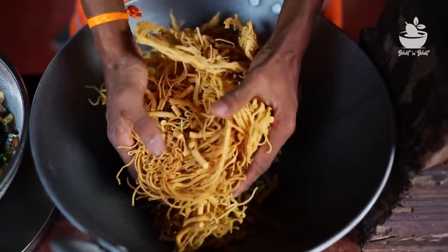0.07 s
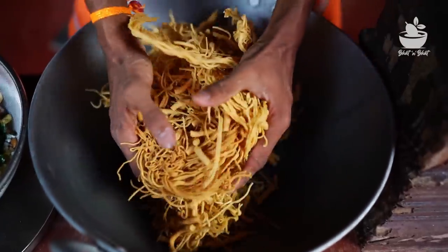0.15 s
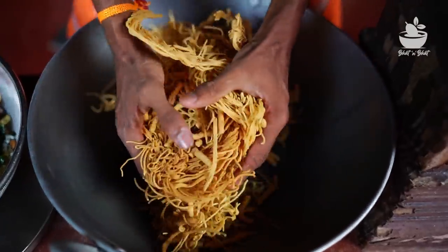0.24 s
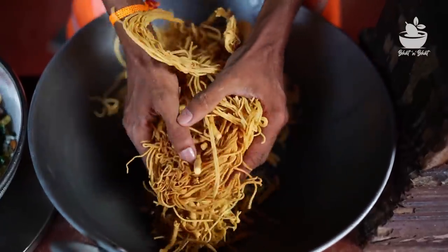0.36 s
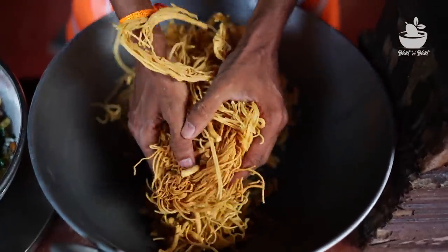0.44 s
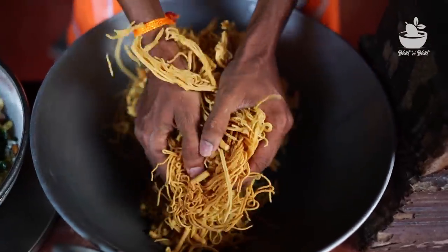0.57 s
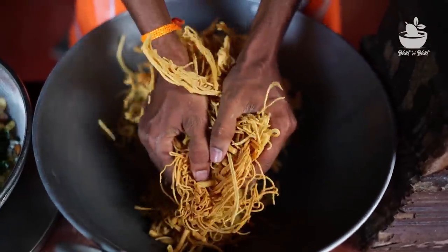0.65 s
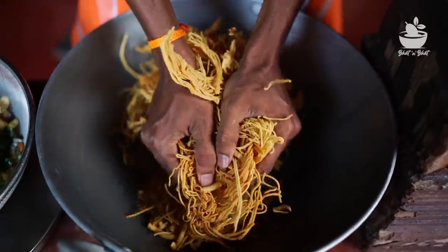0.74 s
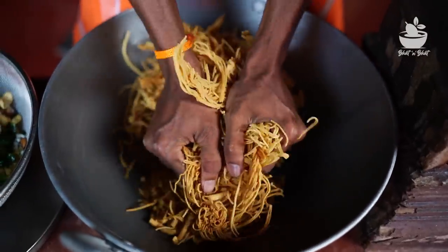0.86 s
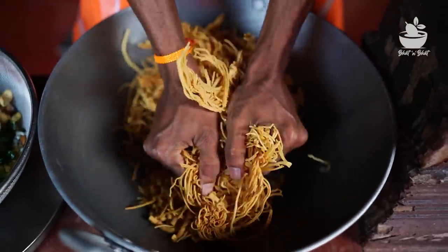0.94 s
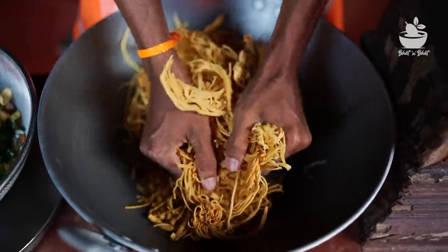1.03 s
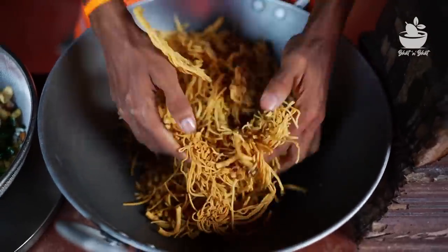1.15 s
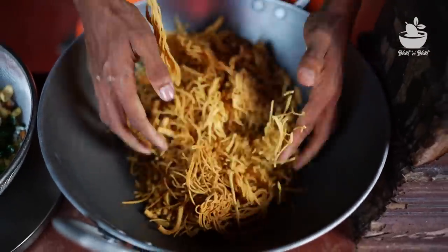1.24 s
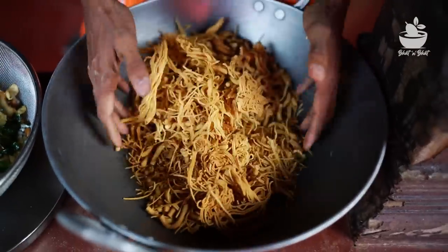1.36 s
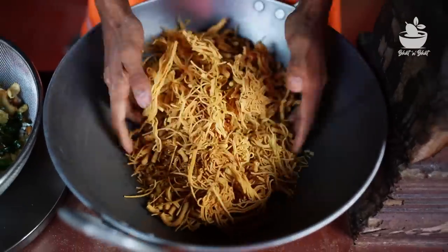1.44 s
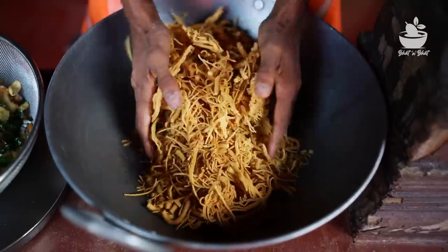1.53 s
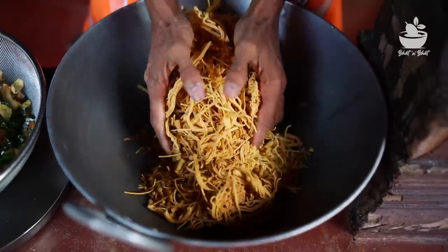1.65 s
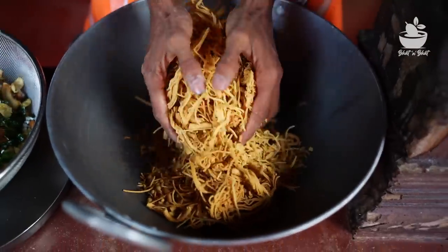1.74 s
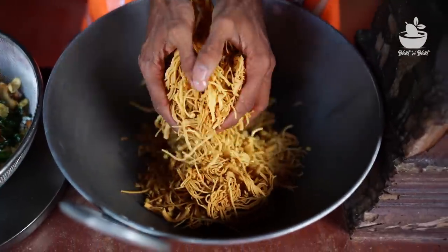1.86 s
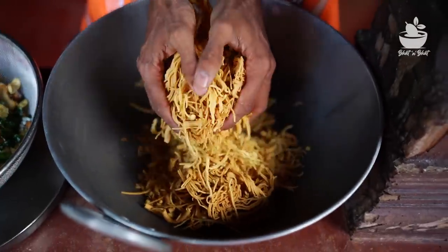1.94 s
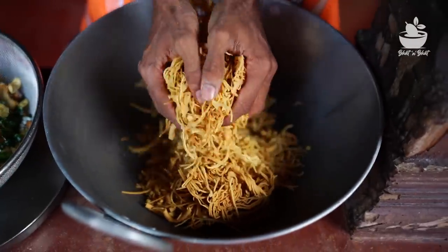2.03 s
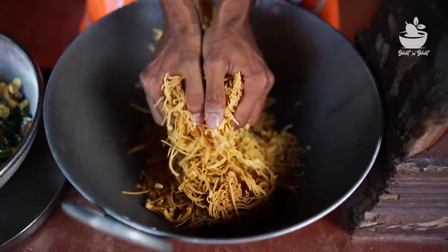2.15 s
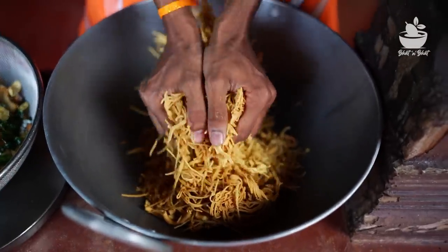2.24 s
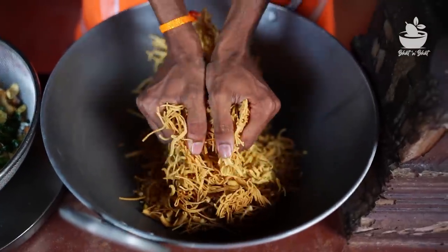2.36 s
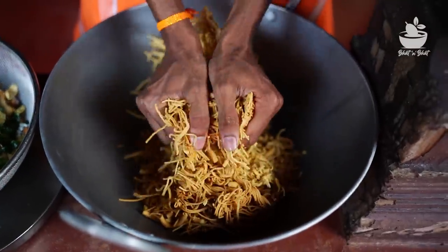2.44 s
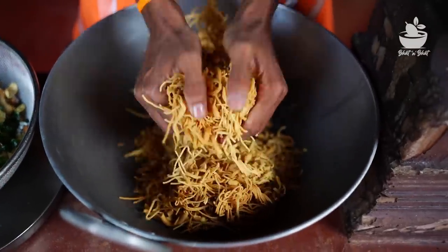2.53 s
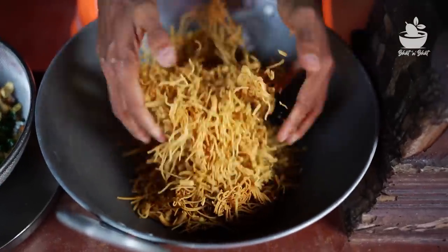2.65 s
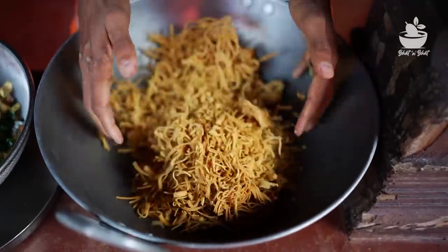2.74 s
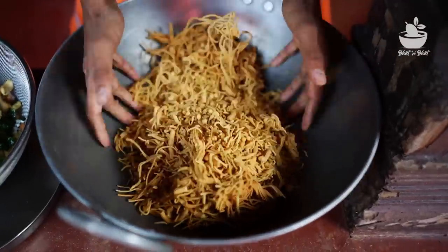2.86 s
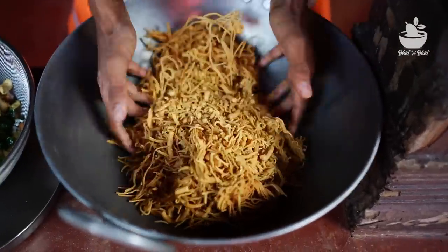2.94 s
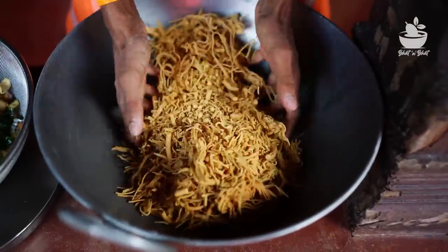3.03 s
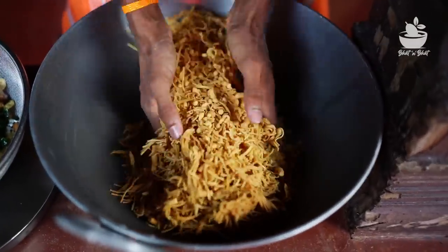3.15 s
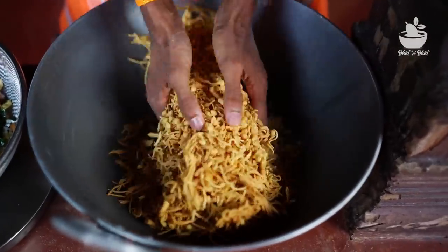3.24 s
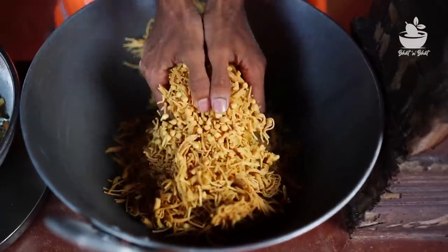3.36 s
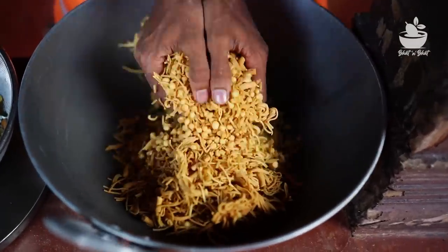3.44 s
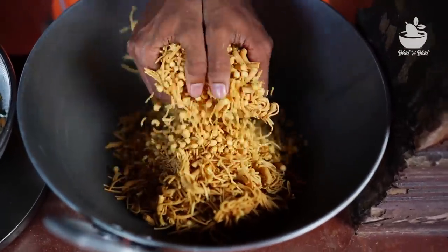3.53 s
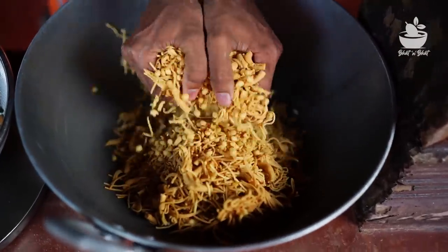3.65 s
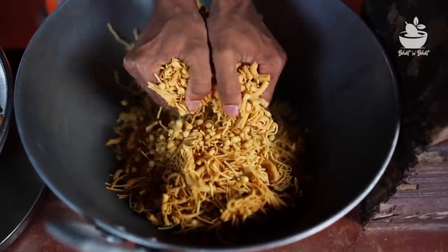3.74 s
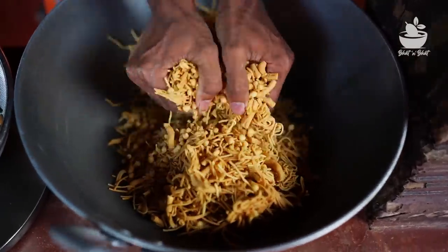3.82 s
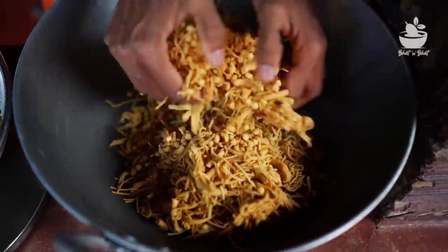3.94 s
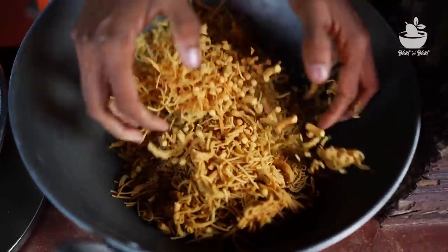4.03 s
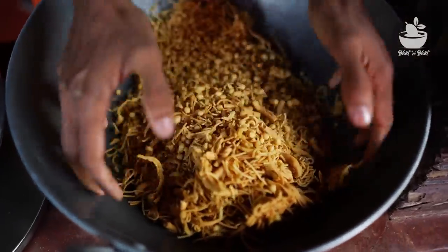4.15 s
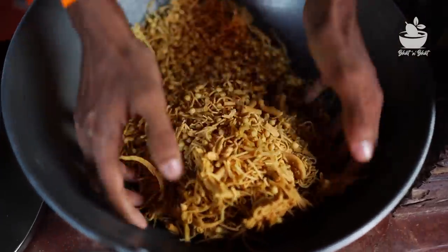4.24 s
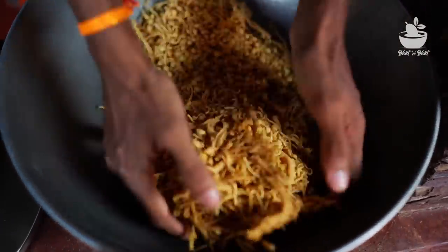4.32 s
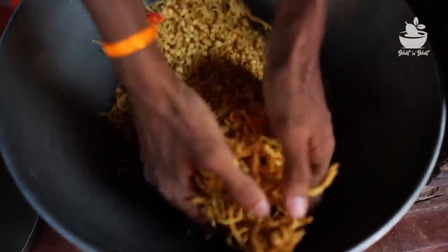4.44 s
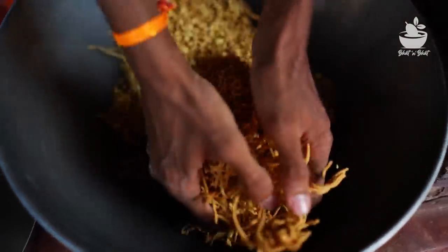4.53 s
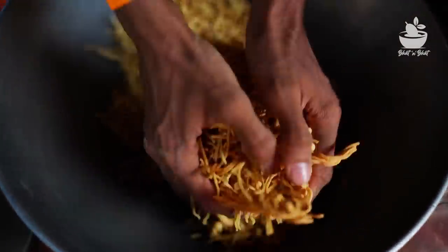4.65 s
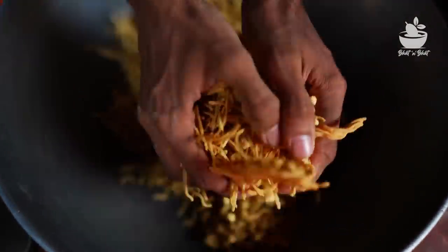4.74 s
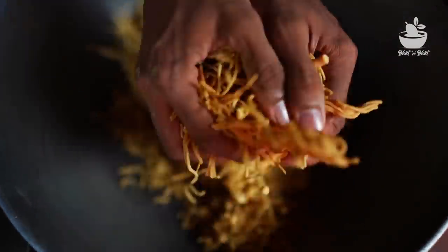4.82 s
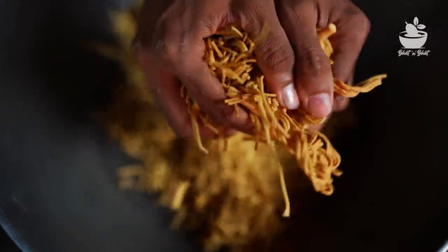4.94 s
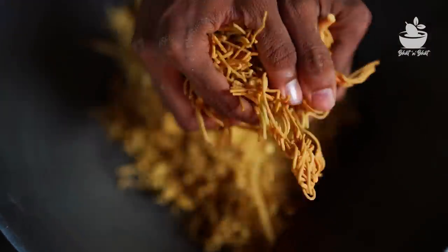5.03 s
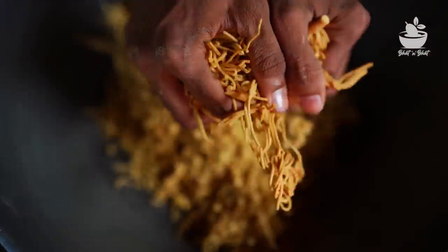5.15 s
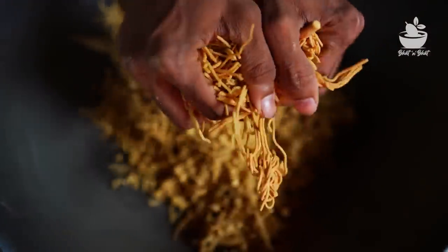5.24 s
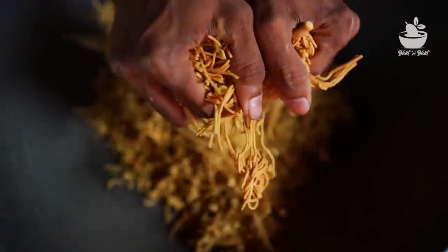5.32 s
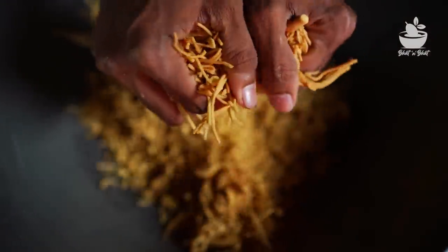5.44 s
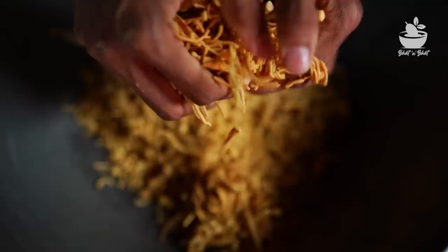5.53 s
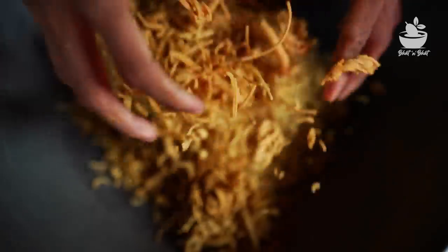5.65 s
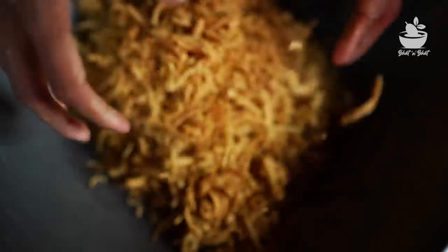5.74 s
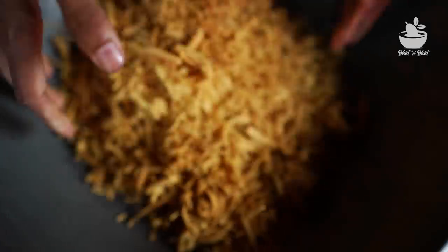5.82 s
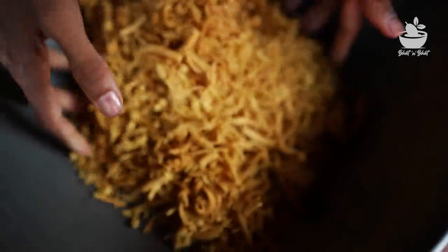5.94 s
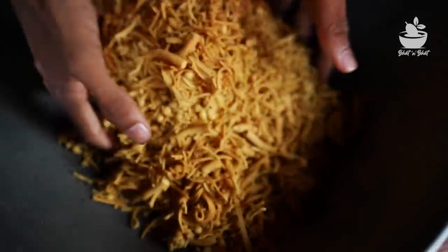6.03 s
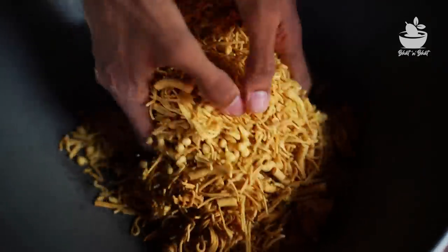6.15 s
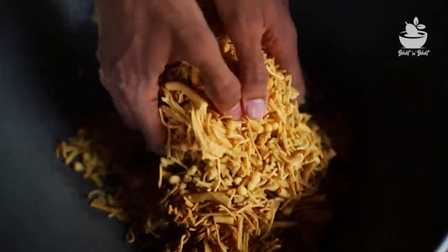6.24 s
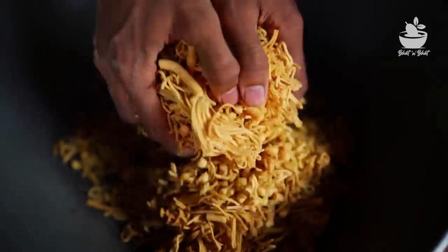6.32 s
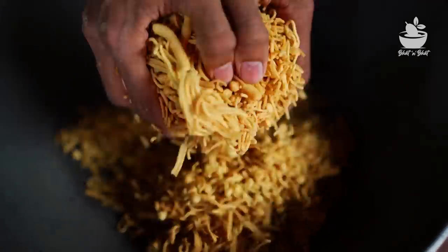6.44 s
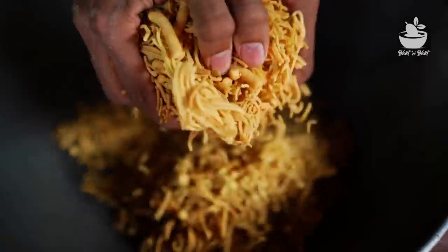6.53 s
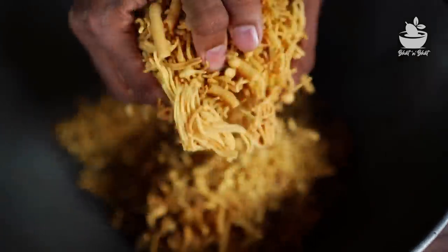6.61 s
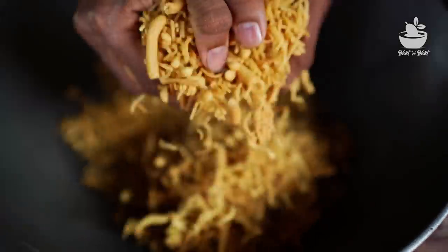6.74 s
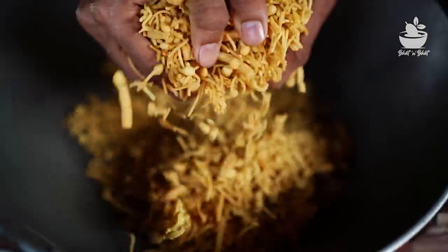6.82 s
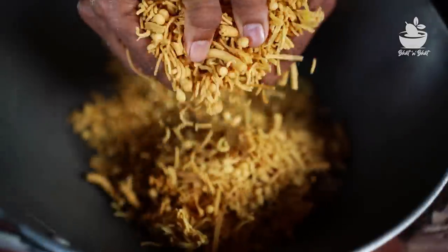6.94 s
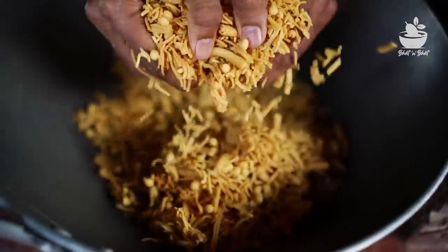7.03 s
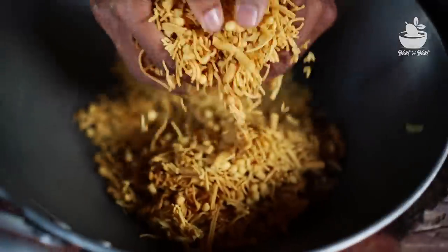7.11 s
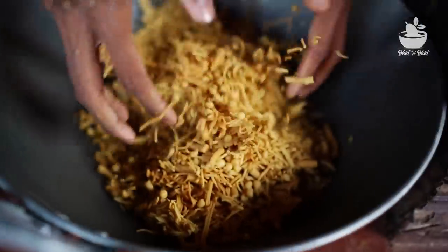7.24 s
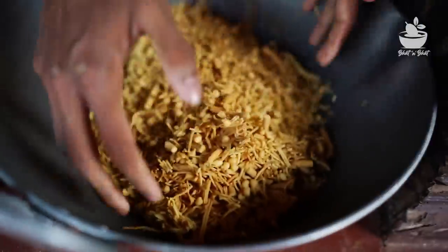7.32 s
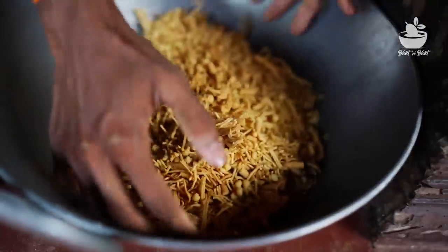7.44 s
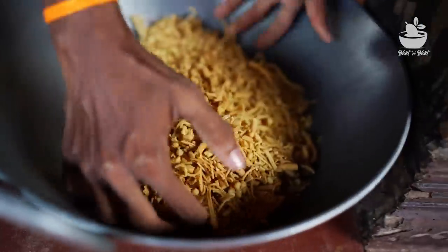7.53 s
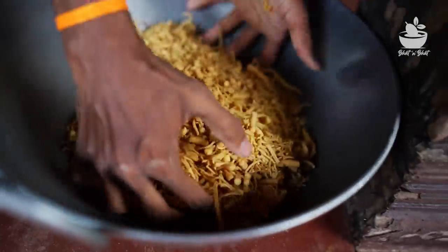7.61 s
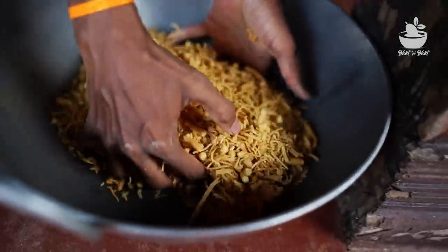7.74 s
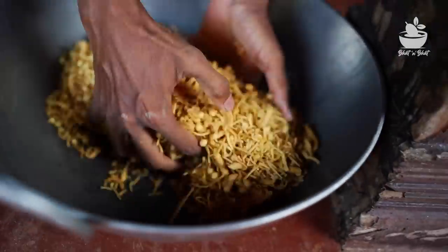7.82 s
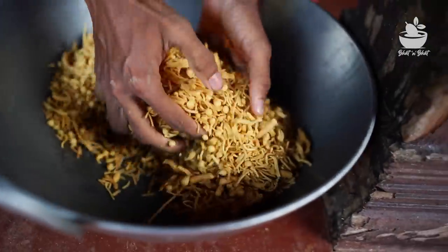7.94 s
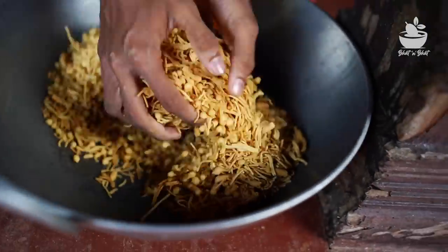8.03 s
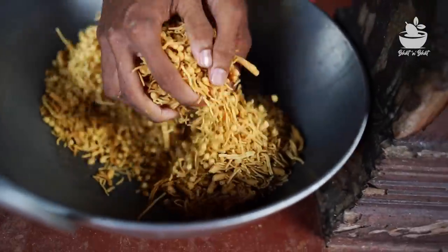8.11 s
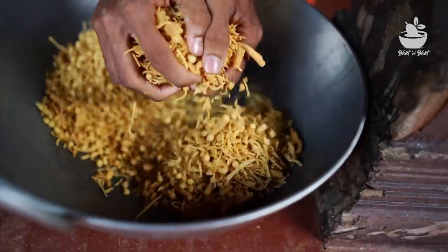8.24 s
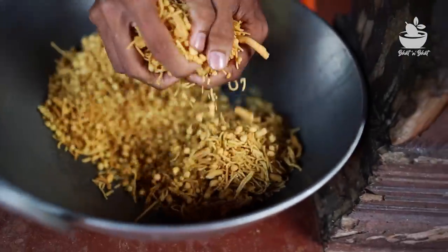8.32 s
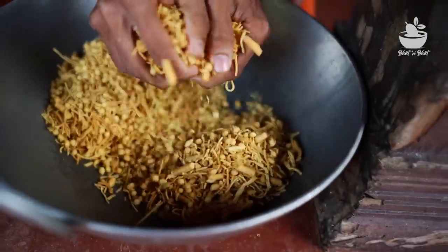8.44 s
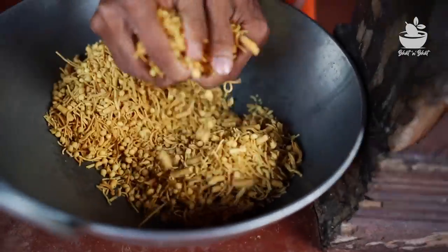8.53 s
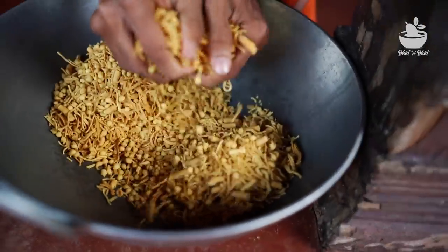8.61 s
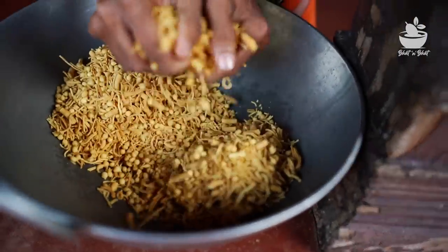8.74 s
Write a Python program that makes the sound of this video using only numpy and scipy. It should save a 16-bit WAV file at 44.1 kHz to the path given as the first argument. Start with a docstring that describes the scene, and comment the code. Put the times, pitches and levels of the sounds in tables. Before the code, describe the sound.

Two hands crush crisp fried strands over a steel wok, heard close up in a small, quiet kitchen. Each squeeze gives a bright crunch full of tiny snaps. The crumbs patter down, then the hands sweep the heap together with a dry rustle, faint scrapes and an occasional hollow bump of the bowl. The cycle repeats about five times and ends in a long, crackling squeeze.

```python
"""Two hands crush crisp fried strands over a steel wok, heard from close by in a small kitchen.
First the fists squeeze, and brittle fracture releases thousands of tiny snaps. The handful then drops,
and the impacts of its crumbs excite the resonances of the steel. Next the hands sweep the heap together,
rustling by friction along the wall and at times bumping the hollow bowl. The cycle runs five times, with
more and more loose crumbs skittering, and a last long squeeze ends it. Faint room noise lies under it."""
import sys
import numpy as np
from scipy import signal
from scipy.fft import rfft, irfft
from scipy.io import wavfile
from scipy.ndimage import uniform_filter1d

SR = 44100
rng = np.random.default_rng(int(sys.argv[2]) if len(sys.argv) > 2 else 0)


def wrap_up_sound(samples):
    """Save the sound to the file named by the first command line argument, as 16-bit audio."""
    columns = np.atleast_2d(samples).T
    # keep every value between -1 and 1, then stretch to whole-number steps
    tamed = np.clip(columns, -1, 1)
    steps = np.round(tamed * 32767).astype(np.int16)
    wavfile.write(sys.argv[1], SR, steps)


N = 386905
TIME = np.arange(N) / SR

# Hand movements. Their levels are nominal: contacts() weights them for each kind of contact.
# Fists squeeze: (start [s], length [s], final level [dB], build-up [dB], final spill level [dB])
SQUEEZES = [(0.034, 0.28, -33, 0, -41.5), (0.444, 0.2, -26.5, 1.5, -30.5), (0.708, 0.24, -21.5, 0, -34.5),
            (1.734, 0.11, -36, -1, -31.5), (2.057, 0.25, -23, 6, -29.5), (2.348, 0.072, -29, -1.5, -43),
            (3.605, 0.17, -27, 5, -38), (4.062, 0.048, -29.5, 2.5, -41), (4.408, 0.11, -33, -2, -36),
            (4.867, 0.16, -28, 6.5, -35), (5.13, .23, -25.5, 2.5, -49), (6.343, 0.0098, -46, -2, -40),
            (6.65, .19, -29, 9.5, -26), (8.244, .49, -31.5, 1, -33)]
# A handful crackles in the closed hands: (start [s], length [s], final level [dB])
HOLDS = [(0.0, 0.35, -37.5), (1.0, .15, -42), (1.87, 0.18, -44.5), (3.303, 0.33, -35.5), (4.615, 0.22, -38),
         (6.294, 0.684, -37), (7.036, .17, -43), (7.9, 0.31, -38)]
# Hands open, then reach under the heap: (start [s], level [dB], reach delay [s], reach level [dB])
DROPS = [(1.22, -28.5, 0.22, -28.5), (2.73, -25.5, 0.12, -32.5), (4.08, -28, .19, -26.5),
         (5.71, -26, 0.2, -29), (7.269, -26.5, 0.27, -29.5)]
# Hands sweep the heap along the wall: (start [s], length [s], level [dB], settling time [s])
SWEEPS = [(0.104, 0.067, -34, 0.04), (1.2, 0.038, -26.5, 0.036), (1.519, 0.083, -23.5, .11),
          (1.704, 0.023, -29.5, 0.16), (2.74, 0.021, -28.5, 0.025), (3.012, 0.13, -23.5, 0.13),
          (4.037, 0.052, -29, 0.032), (4.38, 0.1, -26, 0.06), (6.042, 0.093, -22.5, 0.14),
          (7.235, 0.042, -30, .04), (7.674, 0.093, -22.5, 0.16)]

# Thick pieces snap or strike the steel: (time [s], peak level [dB], pitch [Hz], decay [s])
CRACKS = [(0.43, -16, 7400, 0.0046), (0.735, -10, 6750, 0.011), (0.904, -9, 9400, 0.015),
          (1.021, -13.5, 6650, 0.0029), (1.211, -13, 4200, .0038), (1.23, -6.5, 4350, 0.0051),
          (1.303, -12, 6460, 0.0078), (1.968, -17.5, 4250, 0.005), (2.595, -20.5, 4570, 0.0041),
          (2.731, -4, 4180, 0.0035), (2.754, -8, 5500, 0.0091), (2.948, -8.5, 6100, 0.0032),
          (3.281, -14, 4530, .005), (3.374, -15.5, 5400, .0067), (3.512, -16, 4270, 0.0048),
          (3.646, -9, 6500, 0.0032), (3.703, -10, 5560, .0045), (3.843, -10.5, 5460, 0.0058),
          (3.867, -13.5, 4470, 0.015), (3.942, -15, 4240, .004), (4.094, -11, 7000, .0047),
          (4.13, -7.5, 5030, 0.011), (4.204, -12, 4560, 0.0045), (4.637, -17, 4300, 0.0046),
          (5.055, -5, 4400, 0.0057), (5.421, -9, 7800, 0.007), (5.62, -12, 7550, 0.0061),
          (5.701, -8.5, 5650, 0.0057), (5.803, -7, 5740, 0.0037), (5.815, -8, 6160, 0.0037),
          (6.142, -10.5, 5700, .0035), (6.662, -5.5, 4270, 0.0027), (6.71, -7, 4700, 0.0036),
          (6.745, -9, 4600, 0.0053), (6.837, -8, 4520, .0053), (6.973, -12, 9500, .0038),
          (6.984, -9, 3640, .005), (7.392, -15, 6500, .0024), (7.421, -14.5, 5300, 0.005),
          (7.787, -8, 5360, 0.0077), (8.177, -12.5, 4200, .0027), (8.223, -8.5, 5840, .0042),
          (8.28, -6.5, 5850, 0.0036), (8.317, -12, 5800, 0.014), (8.374, -5.5, 6100, 0.0023),
          (8.381, -4, 6200, 0.0022), (8.426, -6, 6170, 0.0045), (8.541, -6.5, 4220, 0.0045),
          (8.579, -13.5, 5900, 0.0028), (8.607, -5.5, 5300, .0036), (8.744, -13, 6200, 0.0018)]
# Fists close tight on the last strands: (time [s], Gaussian width [s], nominal level [dB])
CLENCHES = [(0.929, 0.047, -34.5), (2.323, 0.057, -32.5), (3.73, 0.058, -39), (5.295, 0.013, -29),
            (5.36, 0.017, -34.5), (5.813, 0.012, -37.5), (6.87, 0.17, -42), (8.683, 0.099, -43)]
# A hand scrapes the steel: (start [s], length [s], final level [dB], first pitch [Hz], last pitch [Hz])
SCRAPES = [(1.53, 0.054, -45, 2325, 2310), (1.7, .14, -40.5, 4130, 4060), (2.999, .42, -47.5, 2206, 2303),
           (4.347, 0.48, -51, 3200, 3170), (6.033, 0.11, -42.5, 2360, 2260),
           (6.076, 0.26, -49.5, 3250, 3200), (7.672, 0.85, -49.5, 3295, 3160),
           (7.777, 0.23, -49, 2170, 2510)]
# Hands bump the wok: (time [s], peak level [dB], rattle decay [s])
BUMPS = [(1.603, -28, 0.026), (1.652, -27.5, 0.033), (4.108, -16.5, 0.0027), (4.131, -20.5, 0.004),
         (4.403, -28, 0.017), (5.827, -29, 0.005), (6.046, -16, 0.015), (6.063, -22, 0.014),
         (8.174, -24, 0.038), (8.228, -31, 0.014)]
# Heavy shoves rock the whole wok: (time [s], peak level [dB])
SHOVES = [(1.606, -28.5), (4.407, -31.5), (6.058, -22.5), (8.177, -34)]

# Resonances of the steel: (frequency [Hz], bandwidth [Hz], relative height [dB])
WOK_MODES = [(235, 48, 5.5), (421, 4.4, 12), (836, 4.1, 1), (2260, 84, -3), (2330, 100, 0), (3200, 86, 4),
             (3516, 57, 4.5), (4060, 85, 9), (4300, 73, 2.5), (4620, 75, 7), (5000, 23, 7), (5466, 145, 7),
             (5660, 46, -3.5), (6170, 98, 8), (6510, 45, 5.5), (7000, 44, 8.5), (6900, 140, -9),
             (7710, 55, 7.5)]
# Low modes of the rocking wok: (frequency [Hz], relative level [dB], decay [s])
ROCKING_MODES = [(120, -17, 0.048), (152, -6, 0.019), (257, 8, 0.028)]

# Broad spectrum radiated by each source: (frequency [Hz], relative level [dB])
SNAP_SPECTRUM = [(60, -52), (150, -30), (250, -3.5), (650, -5.5), (1000, -8.5), (1450, -6), (1900, -8),
                 (2800, -5), (3800, -0.5), (7500, 1.95), (10000, -0.5), (13000, -5), (16000, -15.5)]
CRACK_SPECTRUM = [(100, -54), (300, -9.5), (1200, -22), (2700, -18.5), (3800, -7), (6000, -5.5),
                  (10000, -4.5), (16000, -24.5)]
CLENCH_SPECTRUM = [(100, -36), (300, -3), (550, 9), (1050, 0.5), (1450, 5), (1900, 2.5), (2400, -1),
                   (4000, 4), (12000, -44)]
CRUMB_SPECTRUM = [(100, -29), (300, -6.5), (1000, -35), (1800, -7), (2300, -32), (3150, -9), (3650, 3),
                  (4300, 4.5), (6500, 1.5), (9500, 4.5), (12000, -5), (16000, -7)]
SLIDE_SPECTRUM = [(100, -47), (260, -10), (800, -12.5), (1450, -19.5), (1800, -3), (2280, -3.5),
                  (2750, -7.5), (3300, -2), (4100, -1), (6000, -5.5), (8000, -7), (11000, -13),
                  (16000, -29.5)]
SKITTER_SPECTRUM = [(100, -45), (300, -38), (2800, -28), (4000, -9), (4900, -1), (5500, -3.5), (6300, -2.5),
                    (7500, -3.5), (11000, -16), (16000, -42)]
BUMP_SPECTRUM = [(40, -30), (90, -13), (160, 1), (260, 7.5), (400, 4), (800, 11.5), (1200, -7), (4000, -38)]
RUMBLE_SPECTRUM = [(40, -51), (90, -34.5), (150, -18.5), (185, -15), (230, -2.5), (400, -0.5), (600, -6),
                   (820, -10.5), (1100, -16), (2500, -29), (8000, -52)]
KITCHEN_SPECTRUM = [(20, -6), (60, -8), (110, 5.5), (170, 7.5), (235, 19.5), (330, 11), (800, 8),
                    (2500, -7), (16000, -9.5)]


def squeezing(gain):
    """Brittle fracture: strands break in the fists with a bright crunch, barely coupled to the steel."""
    fists = body(SNAP_SPECTRUM, ring_db=-30)
    fractures = grains(gain, per_s=7400, spread_db=4.5, bursts_per_s=180, burst_s=0.0015, burst_db=-4)
    fractures = splintered(fractures, decay_s=0.0035, db=-2.5)
    crunch = at_level(through(fractures, fists), gain)
    snaps = lone_snaps(low_hz=5000, high_hz=12730, ring_s=0.0017, spread_db=14, rough=0.56, count=850)
    snaps = unit(through(snaps, fists))
    thin_ticks = lone_snaps(low_hz=8080, high_hz=14600, ring_s=0.0017, spread_db=16, rough=0.24, count=700)
    return undb(-0.3) * crunch + gain * (undb(-6.5) * snaps + undb(-11.5) * thin_ticks)


def cracking(piece_q=4.2, broadband_db=-5, click_size=1.8):
    """Impulse excitation: a click and its splinters ring a thick piece and then the steel."""
    out, t = np.zeros(N), TIME[:SR // 20]
    steel = body(CRACK_SPECTRUM, ring_db=1)[:len(t)]
    for at_s, peak_db, hz, decay_s in CRACKS:
        splinters = rng.choice([-1, 1], len(t)) * np.exp(-t / decay_s) * (t > 0)
        force = click_size * (t == 0) + splinters
        piece = signal.lfilter(*signal.iirpeak(hz, piece_q, fs=SR), force)
        add(out, at_s, through(piece + undb(broadband_db) * force, steel), peak_db)
    return out


def clenching():
    """Enclosure: closed fists filter the fractures deep inside them to a dull, hollow sound."""
    gain = sum(undb(db) * np.exp(-0.5 * ((TIME - at_s) / width_s) ** 2) for at_s, width_s, db in CLENCHES)
    fractures = grains(gain, per_s=600, spread_db=7.5, bursts_per_s=180, burst_s=0.0036, burst_db=-4)
    fractures = splintered(fractures, decay_s=0.003, db=-10)
    return undb(1) * at_level(through(fractures, body(CLENCH_SPECTRUM, ring_db=-20)), gain)


def pattering(gain):
    """Impact noise: crumbs land on the heap and the steel; longer ones tinkle at their own pitch."""
    steel = body(CRUMB_SPECTRUM, ring_db=-3.5)
    impacts = grains(gain, per_s=2000, spread_db=6, bursts_per_s=160, burst_s=0.0044, burst_db=-3)
    impacts = splintered(impacts, decay_s=0.0053, db=1)
    patter = at_level(through(impacts, steel), gain)
    tinkles = lone_snaps(low_hz=3390, high_hz=8370, ring_s=0.0033, spread_db=10, rough=0.2, count=800)
    return undb(-1.5) * patter + undb(-8) * gain * unit(through(tinkles, steel))


def sweeping(gain):
    """Stick-slip friction: strand ends catch and slip on the wall and keep the steel ringing."""
    slips = grains(gain, per_s=8100, spread_db=3, bursts_per_s=51, burst_s=0.01, burst_db=-10.5)
    return undb(-2.2) * at_level(through(slips, body(SLIDE_SPECTRUM, ring_db=2)), gain)


def skittering(gain, start_db=-8.5, growth_db_per_s=1.11):
    """Lightly damped resonance: loose crumbs ring the bare wall, louder as the crushing goes on."""
    gain = gain * undb(start_db + growth_db_per_s * TIME)
    ticks = grains(gain, per_s=2300, spread_db=5, bursts_per_s=60, burst_s=0.0028, burst_db=-8)
    return at_level(through(ticks, body(SKITTER_SPECTRUM, ring_db=6)), gain)


def bumping(rattle_db=-21, swing_rise_s=0.0033):
    """Free vibration: a blow thuds in the bowl as the heap settles; a shove starts the rocking modes."""
    out, t = np.zeros(N), TIME[:SR // 4]
    bowl = body(BUMP_SPECTRUM, ring_db=6.5)
    for at_s, peak_db, decay_s in BUMPS:
        rattle = undb(rattle_db) * rng.standard_normal(len(t)) * np.exp(-t / decay_s)
        add(out, at_s, through((t == 0) + rattle, bowl), peak_db)
    swing = sum(undb(db) * np.sin(2 * np.pi * hz * t) * np.exp(-t / decay_s)
                for hz, db, decay_s in ROCKING_MODES)
    swing *= 1 - np.exp(-t / swing_rise_s)
    for at_s, peak_db in SHOVES:
        add(out, at_s, swing, peak_db)
    return out


def scraping(bandwidth_hz=190, fade_db=8.5, edge_s=0.04):
    """Narrow-band friction noise: a rough tone glides with the hand and fades as it slows."""
    out = np.zeros(N)
    lowpass = signal.butter(2, bandwidth_hz / 2, fs=SR, output="sos")
    for at_s, length_s, db, first_hz, last_hz in SCRAPES:
        rub = unit(signal.sosfilt(lowpass, rng.standard_normal((2, N))))
        hz = np.interp(TIME, [at_s, at_s + length_s], [first_hz, last_hz])
        phase = 2 * np.pi * np.cumsum(hz) / SR
        gain = stroke(at_s, length_s, db, edge_s, edge_s, build_db=-fade_db)
        out += gain * (rub[0] * np.cos(phase) + rub[1] * np.sin(phase))
    return out


def rumbling(gain):
    """Forced vibration: the heap, rubbing under the hands, drives the low tones of the hollow bowl."""
    rubs = grains(gain, per_s=1500, spread_db=2, bursts_per_s=43, burst_s=0.012, burst_db=-14)
    return undb(-2.46) * at_level(through(rubs, body(RUMBLE_SPECTRUM, ring_db=0)), gain)


def reflections(delay_s=0.00068, decay_s=0.012, energy_db=-11.5):
    """Diffuse reflection: the direct impulse is followed by a dying cloud from bowl and walls."""
    t = TIME[:SR // 10]
    cloud = rng.standard_normal(len(t)) * np.exp(-t / decay_s) * (t > delay_s)
    return (t == 0) + undb(energy_db) * cloud / np.linalg.norm(cloud)


def kitchen(level_db=-49):
    """Stationary noise: the faint background of the room, with a low hollow tone."""
    return undb(level_db) * unit(through(rng.standard_normal(N), body(KITCHEN_SPECTRUM, ring_db=-26)))


def movements():
    """Amplitude envelopes: the strokes of each kind of hand movement combine into one gain curve."""
    edges = dict(rise_s=0.037, fall_s=0.045)
    squeeze = power_sum(*(stroke(at, length, db, **edges, build_db=build)
                          for at, length, db, build, _ in SQUEEZES))
    spill = power_sum(*(stroke(at, length, db, **edges, build_db=build)
                        for at, length, _, build, db in SQUEEZES))
    hold = power_sum(*(stroke(at, length, db, rise_s=0.034, fall_s=0.081, build_db=5)
                       for at, length, db in HOLDS))
    drop = power_sum(*(stroke(at, 0.1, db, rise_s=0.046, fall_s=0.055) for at, db, _, _ in DROPS))
    reach = power_sum(*(stroke(at + delay, 0.091, db, rise_s=0.055, fall_s=0.093)
                        for at, _, delay, db in DROPS))
    sweep = power_sum(*(stroke(at, length, db, rise_s=0.69 * length, fall_s=settling)
                        for at, length, db, settling in SWEEPS))
    return squeeze, spill, hold, drop, reach, sweep


def contacts(squeeze, spill, hold, drop, reach, sweep):
    """Power summation: movements feed each kind of contact; constant floors keep the heap astir."""
    breaking = power_sum(squeeze, hold, undb(-9.5) * drop, undb(-13) * reach,
                         undb(-10.5) * sweep, undb(-43.5))
    sliding = power_sum(sweep, undb(-12) * squeeze, undb(2) * hold, undb(-15) * drop,
                        undb(-10) * reach, undb(-45.5))
    falling = power_sum(spill, undb(-1) * drop, undb(-2.5) * reach, undb(-2) * hold,
                        undb(-9.5) * sweep, undb(-41))
    pressing = power_sum(undb(-20.5) * squeeze, undb(-11) * hold, undb(-14.5) * drop,
                         undb(-8.5) * reach, undb(-13.5) * sweep, undb(-50))
    stirring = power_sum(reach, undb(-3) * drop, undb(-5) * sweep, undb(-7) * spill)
    return breaking, sliding, falling, pressing, stirring


def stroke(start_s, length_s, db, rise_s, fall_s, build_db=0):
    """Envelope of one movement: Gaussian onset, a ramp of build_db ending at db, exponential decay."""
    t = TIME - start_s
    onset = (np.minimum(t, 0) / rise_s) ** 2
    release = np.maximum(t - length_s, 0) / fall_s
    remaining = 1 - np.clip(t / length_s, 0, 1)
    return np.exp(-np.minimum(onset + release, 20)) * undb(db - build_db * remaining)


def grains(gain, per_s, spread_db, bursts_per_s, burst_s, burst_db):
    """Shot noise: tiny impulses swell in bursts; their rate rises with the gain, up to per_s."""
    bursts = signal.lfilter([1], [1, -np.exp(-1 / (burst_s * SR))], clicks(bursts_per_s, spread_db=3))
    activity = np.sqrt(gain / gain.max())
    return clicks(per_s * activity, spread_db) * rng.choice([-1, 1], N) * (1 + undb(burst_db) * bursts)


def clicks(per_s, spread_db):
    """Poisson process with power-law sizes: many small clicks and a few large ones."""
    chance, probability = rng.random(N), np.broadcast_to(per_s / SR, N)
    hit, out = chance < probability, np.zeros(N)
    out[hit] = undb(-spread_db * np.log(chance[hit] / probability[hit] + 0.026))  # offset caps the size
    return out


def splintered(hits, decay_s, db):
    """Exponential decay: each click trails a spray of splinters and reflections at db of its energy."""
    retention = np.exp(-2 / (decay_s * SR))
    energy = signal.lfilter([1 - retention], [1, -retention], hits ** 2)
    return hits + undb(db) * np.sqrt(energy) * rng.standard_normal(N)


def lone_snaps(low_hz, high_hz, ring_s, spread_db, rough, count, size=400):
    """Damped oscillators: single strands ring at random times, and the higher ones die sooner."""
    when, pitch, length, strength = rng.random((count, 4)).T[:, :, None]
    hz = low_hz * (high_hz / low_hz) ** pitch
    decay_s = ring_s * (0.5 + length) * low_hz / hz
    # a splintering strand rings unevenly, which turns its tone into a tick
    uneven_hz = hz * (1 + rough * rng.standard_normal((count, size)))
    phase = 2 * np.pi * np.cumsum(uneven_hz, axis=1) / SR
    snaps = np.sin(phase) * np.exp(-TIME[:size] / decay_s) * undb(spread_db * strength ** 2)
    places = (when * N).astype(int) + np.arange(size)
    return unit(np.bincount(places.ravel(), snaps.ravel(), N)[:N])


def body(spectrum, ring_db, size=8192):
    """Minimum-phase impulse response: a broad spectrum bearing the wok's modes, raised by ring_db."""
    f = np.arange(size // 2 + 1) * SR / size
    hz, db = np.transpose(spectrum)
    peaks = sum(undb(height + ring_db) ** 2 / (1 + (2 * (f - centre) / width) ** 2)
                for centre, width, height in WOK_MODES)
    gain = undb(np.interp(np.log(f + 1), np.log(hz), db)) * np.sqrt(1 + peaks)
    # folding the cepstrum onto positive time makes the response causal
    cepstrum = irfft(np.log(gain))
    cepstrum[1:size // 2] *= 2
    cepstrum[size // 2 + 1:] = 0
    return irfft(np.exp(rfft(cepstrum)))


def at_level(x, gain, size=2600):
    """Running rms normalisation: a texture follows a gain curve and keeps its fast grain."""
    return gain * x / np.sqrt(uniform_filter1d(x ** 2, size) + 1e-12)


def add(out, at_s, sound, peak_db):
    """Superposition: one event joins the mix at its time and peak level."""
    start = int(at_s * SR)
    out[start:start + len(sound)] += (undb(peak_db) * sound / np.abs(sound).max())[:N - start]


def through(x, response):
    """Convolution with an impulse response."""
    return signal.oaconvolve(x, response)[:len(x)]


def power_sum(*gains):
    """Incoherent sources add in power."""
    return np.sqrt(sum(gain ** 2 for gain in gains))


def unit(x):
    """Normalisation to rms 1."""
    return x / np.sqrt(np.mean(x ** 2))


def undb(db):
    """Decibels to amplitude ratio."""
    return np.exp(np.asarray(db) * np.log(10) / 20)


def scene():
    """Superposition: all the handling and its short reflections, over the room noise."""
    breaking, sliding, falling, pressing, stirring = contacts(*movements())
    handling = squeezing(breaking) + clenching() + sweeping(sliding) + pattering(falling)
    handling += rumbling(pressing) + cracking() + bumping() + scraping() + skittering(stirring)
    return (through(handling, reflections()) + kitchen())[None]


def record(dry):
    """Band limiting: a steep elliptic low-pass removes the treble above 16 kHz."""
    return signal.sosfilt(signal.ellip(10, 0.2, 80, 16000, fs=SR, output="sos"), dry)


dry = scene()
out = record(dry)
wrap_up_sound(out)
```